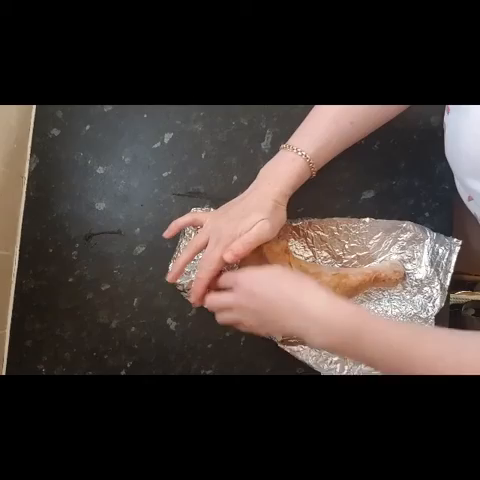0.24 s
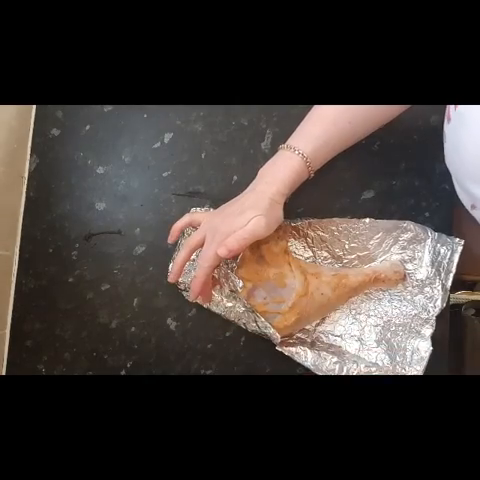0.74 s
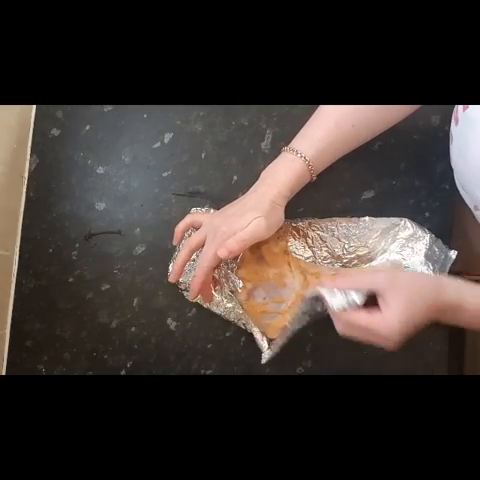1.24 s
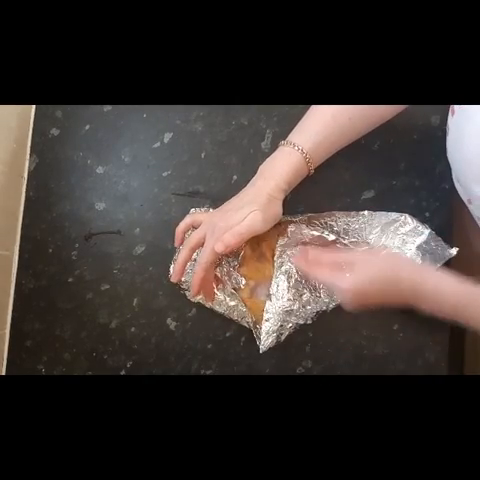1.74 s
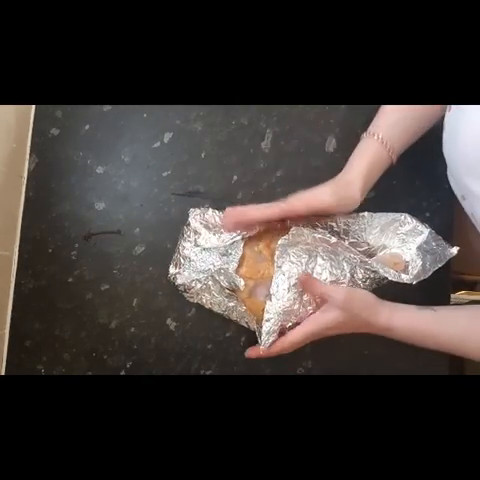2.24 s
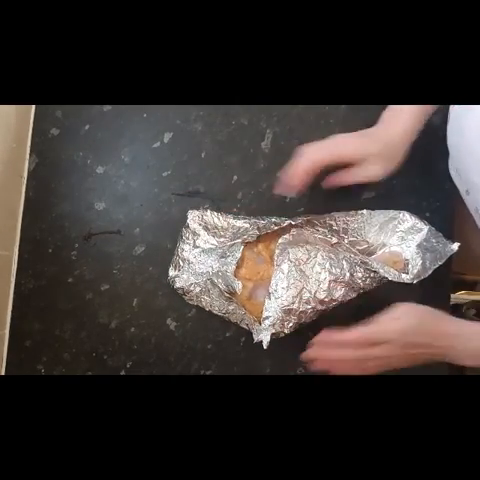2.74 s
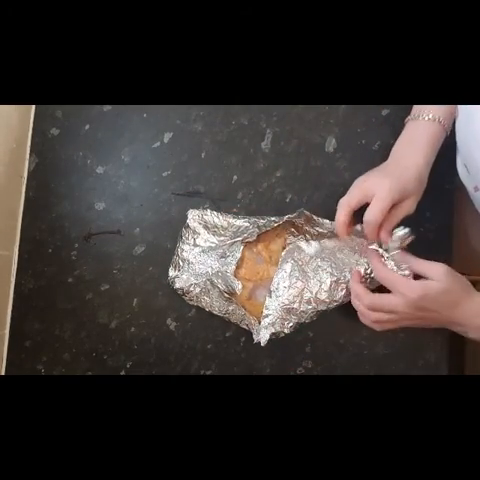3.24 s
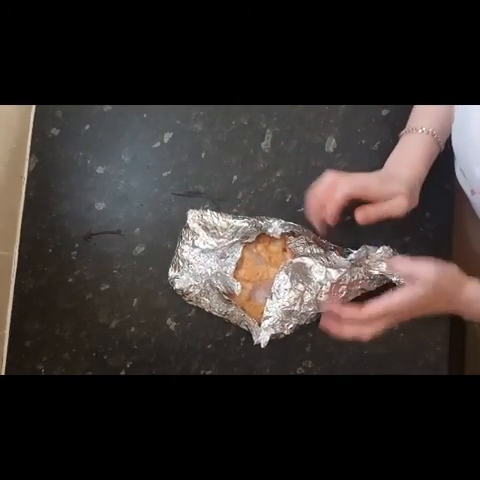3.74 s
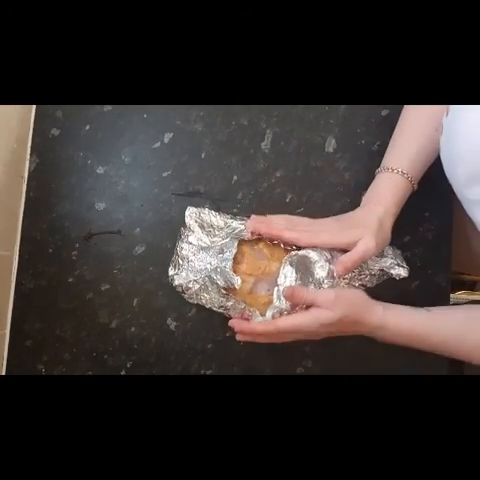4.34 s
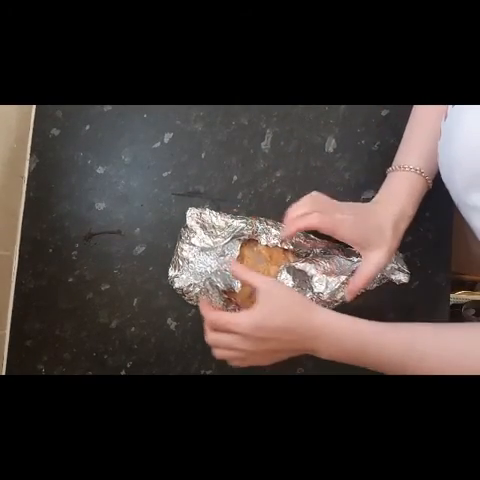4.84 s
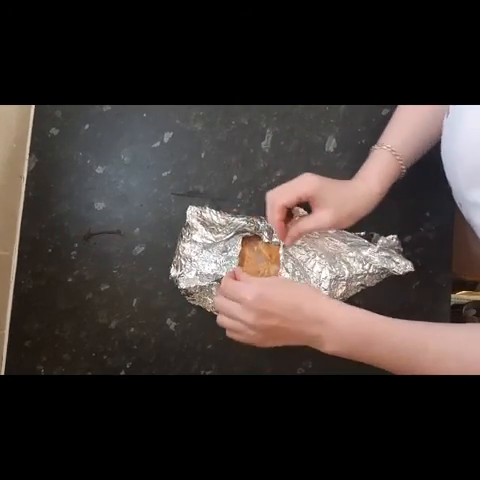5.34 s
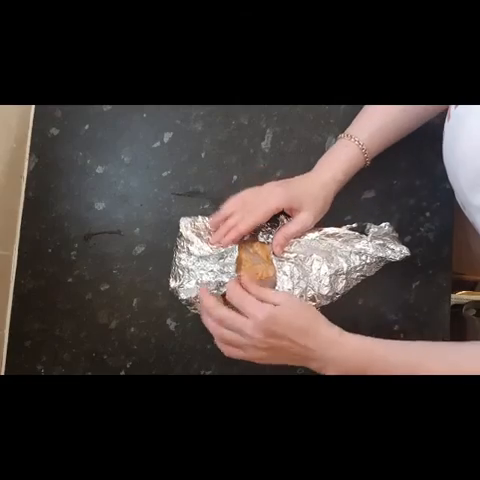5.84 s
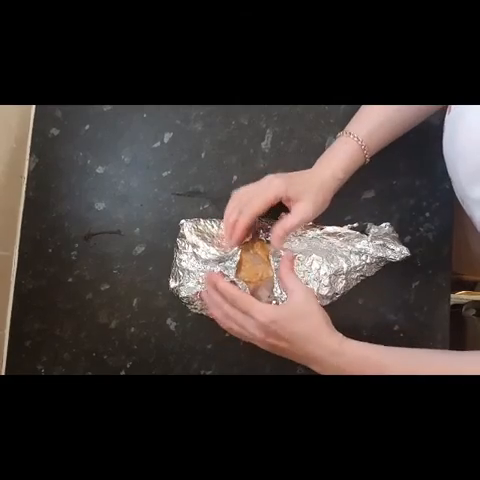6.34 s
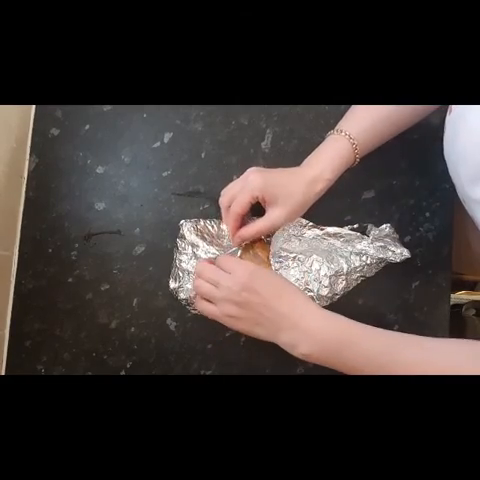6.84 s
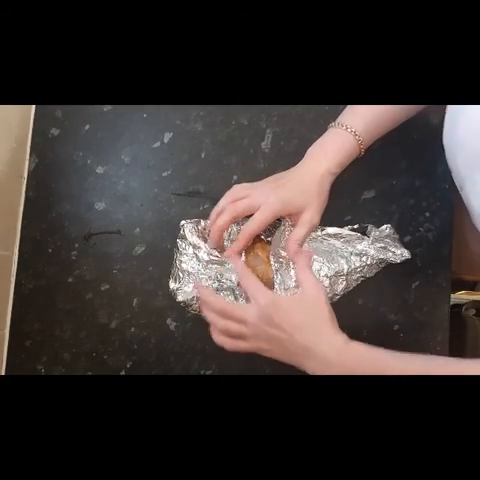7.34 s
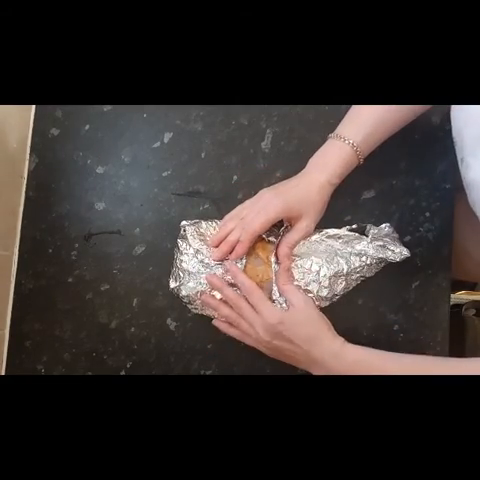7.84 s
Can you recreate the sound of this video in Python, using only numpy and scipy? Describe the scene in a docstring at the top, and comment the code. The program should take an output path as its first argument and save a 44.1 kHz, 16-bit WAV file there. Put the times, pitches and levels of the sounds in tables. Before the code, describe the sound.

Close to a stereo microphone, hands fold aluminium foil round chicken on a kitchen worktop. Dense bright crinkles come in separate bursts, with short near-quiet gaps, strongest around three to four seconds and just after five. Sharp creases snap through, the parcel knocks softly, and a low appliance hum wavers underneath in a small hard room.

```python
"""Ticks of crinkling foil are heard at once, in swarms, over the wavering hum of an appliance.
Two hands fold aluminium foil round a piece of chicken on a kitchen worktop, close to a stereo microphone.
Pressure makes small facets buckle: each tick is a decaying noise burst coloured round its own pitch.
Now and then a crease snaps through as a few quick ticks, or the parcel bumps the worktop and rings low.
A small hard room answers with early reflections and a short tail."""
import sys
import numpy as np
from scipy import signal
from scipy.fft import rfft, irfft, next_fast_len
from scipy.io import wavfile
from scipy.ndimage import uniform_filter1d

SR = 44100
rng = np.random.default_rng(int(sys.argv[2]) if len(sys.argv) > 2 else 0)


def file_out(sig):
    """Save sig as 16-bit WAV at sys.argv[1]."""
    # one column per channel
    cols = np.atleast_2d(sig).T
    # limit, then scale
    lim = np.clip(cols, -1, 1)
    pcm = np.round(lim * 32767).astype(np.int16)
    wavfile.write(sys.argv[1], SR, pcm)


N = 356769
TIME = np.arange(N) / SR


def amp(db):
    """Logarithmic level: decibels to amplitude gain."""
    return 10 ** (np.asarray(db) / 20)


def unit(x):
    """Power normalisation: scales to rms 1."""
    return x / np.sqrt(np.mean(x ** 2) + 1e-20)


def read(points, hz):
    """Logarithmic pitch scale: interpolates a table along log frequency."""
    f, value = np.transpose(points)
    return np.interp(np.log(hz + 1), np.log(f + 1), value)


def add(mix, s, sound):
    """Superposition: adds a stereo sound to the mix from time s [s]."""
    part = mix[:, max(round(s * SR), 0):][:, :sound.shape[1]]
    part += sound[:, :part.shape[1]]


def colour(x, db_of, size=2048):
    """Minimum-phase filtering: a causal response from a gain in dB given over frequency."""
    hz = abs(np.fft.fftfreq(size, 1 / SR)) + 1
    log_gain = np.log(amp(np.maximum(db_of(hz), -100)))
    # the Hilbert transform of the log gain gives the phase
    taps = np.fft.ifft(np.exp(np.conj(signal.hilbert(log_gain)))).real
    return signal.oaconvolve(x, taps[None, :size // 2], axes=1)[:, :x.shape[1]]


def below(hz, edge_hz):
    """Low-pass weighting: near 1 under a soft edge, one half at it, falling to 0 above."""
    return 1 / (1 + (hz / edge_hz) ** 4)


def drift(hz):
    """Low-pass noise: a slow random curve of rms 1, changing up to about hz times a second."""
    size = next_fast_len(N)
    spectrum = rfft(rng.standard_normal(size)) * below(np.fft.rfftfreq(size, 1 / SR), hz)
    return unit(irfft(spectrum, size)[:N])


# likeness of the two channels in a diffuse field: (frequency [Hz], correlation [-1 to 1])
CHANNEL_LIKENESS = [(100, 0.96), (250, 0.85), (500, 0.87), (1000, 0), (2000, 0.16), (4000, 0)]


def pair(z, hz):
    """Spatial coherence: nearby microphones hear long waves alike and short waves apart."""
    alike = np.clip(read(CHANNEL_LIKENESS, hz), -1, 1)
    return np.array([z[0], alike * z[0] + np.sqrt(1 - alike ** 2) * z[1]])


# spectrum of the rumble and hiss: (frequency [Hz], relative density [dB per Hz])
RUMBLE_SPECTRUM = [(20, -10), (32, -15.5), (47, 3.5), (80, -7), (110, 1.5), (165, -14.5), (225, -28.5),
                   (258, -12.5), (292, -27.5), (360, -23.5), (500, -36.5), (900, -49), (3000, -48.5),
                   (9000, -47.5), (16000, -44)]


def rumble(level_db=-50.0):
    """Shaped broadband noise: a low rumble and faint hiss."""
    size = next_fast_len(N)
    hz = np.fft.rfftfreq(size, 1 / SR)
    z = pair(rfft(rng.standard_normal((2, size))), hz) * amp(read(RUMBLE_SPECTRUM, hz))
    return amp(level_db) * unit(irfft(z, size)[:, :N])


# slow level of the hum before its random swell: (time [s], level [dB])
HUM_LEVEL = [(0, -49.5), (1.1, -45.5), (1.9, -52), (2.9, -52), (4.1, -46.5), (4.5, -60.5), (5.1, -46),
             (6.1, -50.5), (6.8, -44.5), (8.09, -51)]


def hum(hum_hz=99.86, octave_db=-64.0, waver_rad=0.5, swell_db=1.43):
    """Modulated tone: an appliance hums at twice the mains frequency, with a steady octave."""
    phase = 2 * np.pi * hum_hz * TIME
    level_db = np.interp(TIME, *np.transpose(HUM_LEVEL)) + swell_db * drift(17)
    tone = amp(level_db) * np.sin(phase + waver_rad * drift(8.8))
    tone += amp(octave_db) * np.sin(2 * phase)
    return np.sqrt(2) * tone  # a sine of peak sqrt(2) has rms 1


def background():
    """Superposition of stationary sources: hum and rumble, slightly stronger on the right."""
    return (rumble() + hum()) * amp([[-1.4], [1.2]])


# reverberation of the kitchen: (frequency [Hz], time to fall by 60 dB [s])
REVERBERATION = [(300, 0.21), (800, 0.19), (2100, 0.14), (5500, 0.15), (14600, 0.067)]


def echoes(early_db=-4, early_s=0.0054, tail_db=-5, size=16384):
    """Room impulse response: quick reflections from worktop and wall, then a short diffuse tail."""
    t = np.arange(size) / SR
    hits = rng.random((2, 2, size)) < 4000 / SR  # 4000 reflections a second
    taps = rng.choice([-1., 1.], (2, 2, size)) * hits
    early = taps[0] * np.exp(-t / early_s) * (t > .001)
    hz, age, z = signal.stft(taps[1] * (t > .005), SR, nperseg=256)
    z = pair(z, hz[:, None]) * amp(-60 * age / read(REVERBERATION, hz)[:, None])
    tail = signal.istft(z, SR, nperseg=256)[1][:, :size]
    return (amp(early_db) * unit(early) + amp(tail_db) * unit(tail)) / np.sqrt(size)


def kitchen(x, places_per_s=7, count=6):
    """Position-dependent reverberation: the sounding spot cycles round places with their own echoes."""
    out = x.copy()
    for place in range(count):
        away = abs((TIME * places_per_s - place + 1) % count - 1)
        share = np.cos(np.pi / 2 * np.minimum(away, 1))  # equal-power crossfade
        out += signal.oaconvolve(x * share, echoes(), axes=1)[:, :N]
    return out


# the parcel pressed against the worktop: (start [s], level [dB], scuff length [s])
BUMP_EVENTS = [(0.337, -67, 0.11), (0.962, -59, 0.029), (0.997, -59, 0.031), (1.498, -63, 0.055),
               (1.579, -66, 0.12), (1.731, -60.5, .06), (2.409, -66, 0.034), (3.298, -65.5, 0.2),
               (3.826, -48.5, 0.037), (7.062, -62.5, 0.025), (7.372, -61, 0.047)]
# modes of the parcel: (frequency [Hz], level [dB], 60 dB decay time of a -49 dB bump [s])
PARCEL_MODES = [(322, 2, 0.11), (400, -5, 0.084), (442.5, 1, 0.14), (573, -17, 0.059), (637, -14, 0.036)]


def bumps():
    """Forced modal vibration: the parcel scuffs the worktop and rings low; a light touch rings less."""
    out, t = np.zeros((2, N)), np.arange(SR // 4) / SR
    for start, db, length in BUMP_EVENTS:
        freedom = amp(0.57 * (db + 49.0))  # scales the ringing time
        ring = np.zeros(len(t))
        for hz, mode_db, t60 in PARCEL_MODES:
            ring += amp(mode_db - 60 * t / (t60 * freedom)) * np.sin(2 * np.pi * hz * t)
        push = signal.windows.hann(round(length * SR))
        # the scuff is a quick flutter of force with no steady part
        force = np.gradient(push * rng.standard_normal(len(push)))
        thud = signal.fftconvolve(force, ring)
        # the level is that of the thud's energy spread over the scuff length
        thud *= np.sqrt(len(push) / np.sum(thud ** 2))
        add(out, start, amp(db) * np.tile(thud, (2, 1)))
    return out


def facet(ring_s, ring_db, crack, size=768):
    """Buckling instability: one facet flips with a sharp crack, then shivers round its own pitch."""
    t = np.arange(size) / SR
    shiver = rng.uniform(-1.045, 1, (3, size)) * np.exp(-t / ring_s)
    shiver[0] *= 1 + crack * np.exp(-t / 0.00011)
    # its place on the sheet sets the delay between the microphones
    lags = rng.integers(0, 8, 2)  # samples
    shared = np.array([np.pad(shiver[0], (lag, 0))[:size] for lag in lags])
    tick = shared + 0.62 * shiver[1:]
    pitch_hz = 800 * (15000 / 800) ** rng.random() ** .7
    tick = colour(tick, lambda hz: ring_db * np.exp(-(np.log(hz / pitch_hz) / 0.25) ** 2), size=256)
    return tick / np.sqrt(np.sum(tick ** 2) / 2)


# the loudest creases: (time [s], relative energy level [dB], low body [dB], top sparkle [dB])
SNAP_EVENTS = [(0.0554, -37, 2, -12), (0.063, -35, 4, -22), (0.1409, -26.5, 0, 2), (0.4753, -42.5, -22, 6),
               (0.7315, -49.5, -1, 10), (0.761, -54, -12, 7), (0.959, -36.5, -4, -3), (1.007, -31, 8, 6),
               (1.017, -30.5, 1, 0), (1.041, -29, 1, 13), (1.06, -32, -4, 1), (1.1094, -33, 7, 21),
               (1.146, -34.5, -5, 12), (1.4743, -33, -3, 7), (1.506, -27, 1, -1.5),
               (1.5214, -30.5, -9.5, 0), (1.5663, -26.5, 5, 5), (1.6073, -35.5, 8, 0),
               (1.7486, -30.5, -7, -4), (1.7934, -30.5, 4.5, 9), (2.303, -36, -11, 11),
               (2.5585, -28.5, -26, 5), (2.6095, -37, -9, -7), (3.0746, -39, -12, -1),
               (3.1016, -31, -14, 7), (3.309, -25, 16, -3), (4.406, -29, -10, 18), (4.5955, -32, -3, -3),
               (4.6678, -33.5, -3, 4), (4.78, -41, -10, 14), (4.9482, -35, -22, 19), (5.0588, -31, 14, -7),
               (5.309, -21.5, 16.5, -7), (5.6324, -31, -7, 15), (5.775, -31.5, 21, -5),
               (5.8542, -34.5, 13, 0), (6.154, -31.5, -2, 15), (6.2069, -34.5, 1, 11.5),
               (6.454, -32.5, 0, 0), (6.7335, -44, -10, -6), (6.793, -35, -3, 2), (6.884, -37, 6, 5.5),
               (6.933, -38.5, -7, 16), (7.0939, -30, -3, -2), (7.1726, -32, -8, 1),
               (7.2434, -35.5, -3, -12), (7.2833, -33, 2, 13), (7.4645, -25, -11, 1), (7.7571, -31, -5, 7),
               (7.895, -30, 5, 13)]


def snaps(after_db=-4, after_s=.003, count=4):
    """Snap-through cascade: a crease gives way and drags ever weaker neighbours after it."""
    out = np.zeros((2, N))
    for s, db, body_db, sparkle_db in SNAP_EVENTS:
        burst = np.zeros((2, 2048))
        for k in range(count):
            delay_s = k * after_s * rng.uniform(0.45, 1)
            add(burst, delay_s, amp(k * after_db) * facet(ring_s=0.0022, ring_db=7.5, crack=1.0))

        def weight_db(hz):
            body = body_db * below(hz, 1540) - 10 * below(hz, 550)
            return body + sparkle_db * (1 - below(hz, 5700))

        burst = colour(burst, weight_db, size=512)
        add(out, s + .001, amp(db) * burst / np.linalg.norm(burst))
    return out


# each fold or squeeze of the hands: (start [s], hardest [s], let go [s], relative level [dB],
# building [dB/s], slackening [dB/s], wide panels [dB], fine wrinkles [dB])
FOLD_EVENTS = [(-0.03, 0.06, 0.065, -46.5, 26, 25, -1, -3.5), (0.102, 0.128, 0.22, -51.5, 35, 34, -0.5, -1),
               (0.231, 0.375, 0.42, -45.5, 40, 84, -4.5, -2), (0.953, 1.025, 1.18, -51.5, 70, 57, -1.5, -3),
               (1.192, 1.234, 1.466, -49.5, 50, 0, -4, 0.5), (1.497, 1.607, 1.63, -47.5, 26, 64, -4, -3),
               (1.66, 1.749, 1.995, -51.5, 50, 27, -4, -2.5), (1.99, 2.02, 2.05, -51.5, 10, 31, 0.5, -2),
               (2.25, 2.409, 2.8, -45.5, 140, 49, -4.5, -2.5),
               (2.704, 2.73, 2.706, -43.5, 92, 55, -4, -1.5), (3.035, 3.202, 3.335, -42, 143, 5.5, 2, -1),
               (3.335, 3.622, 3.745, -41.5, 10, 56, 0, -1.5), (3.787, 3.843, 3.854, -39, 400, 64, -0.5, -4),
               (4.127, 4.199, 4.36, -55.5, 260, -3, -1.5, 0), (4.352, 4.387, 4.44, -48, 100, 74, -5, 0),
               (4.454, 4.526, 4.72, -45, 74, 58, 2, -2.5), (4.789, 4.808, 4.85, -58, 60, 182, 1, -1.5),
               (4.902, 5.034, 5.2, -55, 99, 60, 1, -4.5), (5.043, 5.28, 5.46, -40.5, 25.5, 29, 0.5, -2.5),
               (5.454, 5.5, 5.92, -46, 37, 46, 0.5, -3), (5.725, 5.776, 5.89, -49, 44, 9, 4, -1.5),
               (5.96, 5.995, 6.01, -50, 202, 37, -3, -0.5), (6.055, 6.16, 6.3, -56, 50, 5, -3.5, -4),
               (6.294, 6.323, 6.36, -51.5, 35, 18, -8, 1.5), (6.409, 6.48, 6.5, -41.5, 225, 110, -1.5, -5),
               (6.56, 6.587, 6.85, -63, 60, 70, 2.5, -3.5), (6.712, 6.78, 7.37, -56, 70, 7, -3, -7),
               (7.065, 7.103, 7.2, -52, 60, 5, -2, -3), (7.303, 7.463, 7.48, -46.5, 51.5, 78, 1, 0),
               (7.512, 7.52, 8, -63.5, 15, 25, -0.5, 0), (7.632, 7.778, 8.09, -49.5, 38, 20, -4, -2)]


def handling(t, attack_s=0.019, release_db_per_s=267, settle_db=-74, settle_db_per_s=46, light_touch=0.24):
    """Quasi-static loading: folds build, slacken and let go; gives level, panels and wrinkles in dB."""
    columns = np.transpose(FOLD_EVENTS)[:, :, None]
    start, hardest, end, db, build, slack, panels_db, wrinkles_db = columns
    past, after = np.clip(t, start, end) - hardest, np.maximum(t - end, 0)
    building_db = build * np.minimum(past, 0)
    pressed_db = db + building_db - slack * np.maximum(past, 0) - release_db_per_s * after
    # however hard the fold, the foil goes on ticking faintly afterwards
    settling_db = settle_db - settle_db_per_s * after
    hold = np.clip((t - start) / attack_s, 0, 1)
    power = (hold * amp(np.maximum(pressed_db, settling_db))) ** 2
    total = power.sum(0) + 1e-14
    share = power / total
    # wide panels hold back light_touch dB for each dB the pressure has still to build
    panels_db = (share * (panels_db + light_touch * building_db)).sum(0)
    return 10 * np.log10(total), panels_db, (share * wrinkles_db).sum(0)


# a palm slides flat over the foil instead of creasing it: (start [s], end [s])
PALM_SLIDES = [(0.52, 1.04), (2.8, 3.22), (3.9, 4.2), (7.5, 7.5)]


def swarm(ticks_per_s=520, crowding=.35, spread_db=3.0, rub_db=-13, slide_rub_db=11,
          slide_ticks_db=-5, jerks_db=1.78, count=160):
    """Random point process: facets buckle at even loudness, more often under harder work."""
    coarse = TIME[::64]
    level_db = np.interp(TIME, coarse, handling(coarse)[0])
    rate = ticks_per_s * amp(crowding * (level_db + 53))  # ticks_per_s holds at -53 dB
    # most ticks are small and a few large
    sizes = amp(spread_db * np.minimum(rng.exponential(1, N), 4.5))
    sizes *= rng.random(N) < rate / SR
    # the swarm releases energy as fast as the hands put it in
    window = signal.windows.hann(round(.06 * SR))
    energy = abs(signal.oaconvolve(sizes ** 2, window / window.sum(), "same"))
    sizes /= np.sqrt(energy + 1e-4)
    # the foil gives way in small jerks
    sizes *= amp(jerks_db * drift(17.6))
    which, sign = rng.integers(0, count, N), rng.choice([-1, 1], N)
    # skin sliding on foil: a stronger soft hiss between weaker ticks
    inside = sum((TIME > start) * (TIME < end) for start, end in PALM_SLIDES)
    sliding = uniform_filter1d(1. * inside, size=2048)
    sizes *= amp(slide_ticks_db * sliding)
    out = amp(rub_db + slide_rub_db * sliding) * rng.standard_normal((2, N))
    facets = [facet(ring_s=0.0037, ring_db=6, crack=1.48) for _ in range(count)]
    for at in np.flatnonzero(sizes):
        add(out, at / SR, sign[at] * sizes[at] * facets[which[at]])
    return out


# a cupped hand rubs the foil, and the hollow under it rings:
# (start [s], end [s], first frequency [Hz], last frequency [Hz], strength [dB])
HAND_HOLLOWS = [(0.097, 0.355, 1300, 1590, 12), (4.17, 4.42, 1080, 1100, 12), (6.6, 7.49, 1683, 1570, 7)]


def crinkle(shifting_db=3.0, pocket_width_hz=170):
    """Time-varying resonance: the swarm sounds through a sheet whose shape and colour keep changing."""
    hz, t, z = signal.stft(swarm(), SR, nperseg=512, noverlap=384)
    hz = hz[:, None]
    level_db, panels_db, wrinkles_db = handling(t)
    # wide panels sound low, fine wrinkles high
    db = level_db + panels_db * below(hz, 1960) + wrinkles_db * (1 - below(hz, 8300))
    # resonances of the bending sheet come and go, most clearly in the wide panels
    patches = uniform_filter1d(rng.standard_normal(db.shape), size=4, axis=0)
    patches = uniform_filter1d(patches, size=14, axis=1)
    db = db + shifting_db * unit(patches) * (0.24 + 0.73 * below(hz, 1900))
    # a cupped hand gathers the low sound into one band
    for start, end, first_hz, last_hz, pocket_db in HAND_HOLLOWS:
        gone = np.clip((t - start) / (end - start), 0, 1)
        pocket_hz = first_hz + (last_hz - first_hz) * gone
        band = 1 / (1 + ((hz - pocket_hz) / pocket_width_hz) ** 2)
        db = db + pocket_db * np.sin(np.pi * gone) * (band - 0.24 * below(hz, 1900))
    return signal.istft(z * amp(db), SR, nperseg=512, noverlap=384)[1][:, :N]


# colour of the foil: (frequency [Hz], relative gain [dB])
FOIL_COLOUR = [(200, -6.5), (320, -2), (550, -3.5), (950, -2.5), (1300, 1.5), (2200, 1.5), (4000, 2.5),
               (8500, 0.5), (12000, 4.5), (15800, 0.5)]
# resonances of the worktop corner: (frequency [Hz], width [Hz], gain at the peak [dB])
CORNER_MODES = [(440, 9.3, 7.5), (656, 30, 4), (865.3, 33, 7.5), (1111, 44, 9)]


def foil(crinkle_db=1, snaps_db=16):
    """Linear source filtering: crinkle and snaps share the foil's colour and the corner's resonances."""
    def gain_db(hz):
        peaks = sum(db / (1 + (2 * (hz - f) / width) ** 2) for f, width, db in CORNER_MODES)
        return read(FOIL_COLOUR, hz) + peaks

    return colour(amp(crinkle_db) * crinkle() + amp(snaps_db) * snaps(), gain_db, size=8192)


def scene():
    """Superposition: foil and parcel sound in the kitchen over its background."""
    return kitchen(foil() + bumps()) + background()


def record(dry, edge_hz=15850):
    """Band limitation: a linear-phase low-pass filter removes the extreme treble."""
    taps = signal.firwin(401, edge_hz, window=("kaiser", 9), fs=SR)
    return signal.oaconvolve(dry, taps[None], "same")


dry = scene()
out = record(dry)
file_out(out)
```